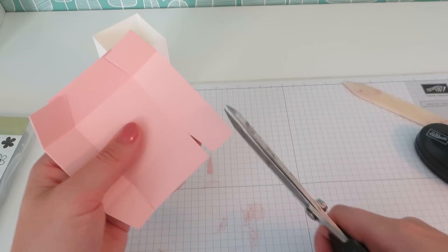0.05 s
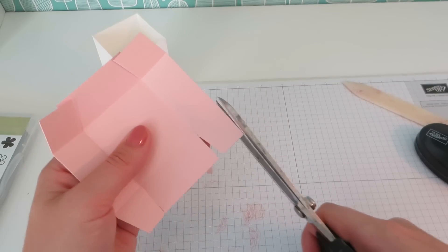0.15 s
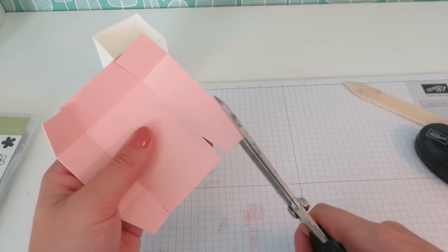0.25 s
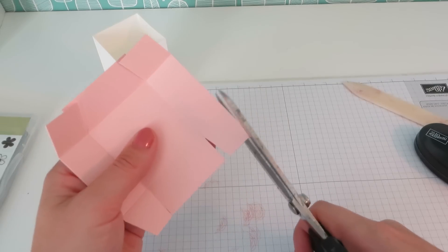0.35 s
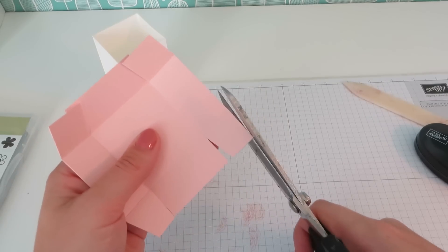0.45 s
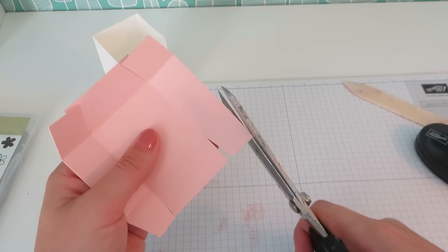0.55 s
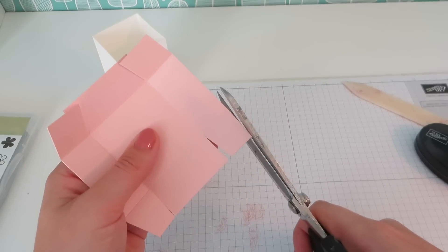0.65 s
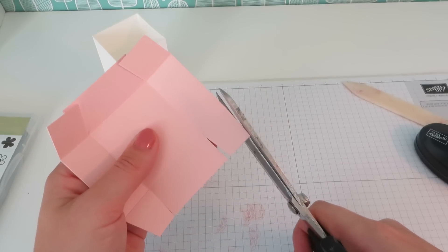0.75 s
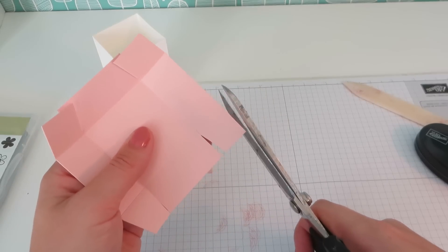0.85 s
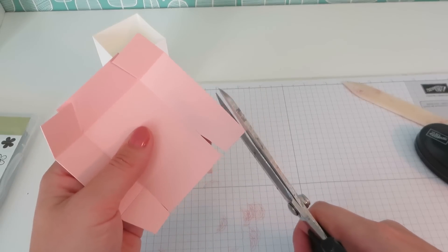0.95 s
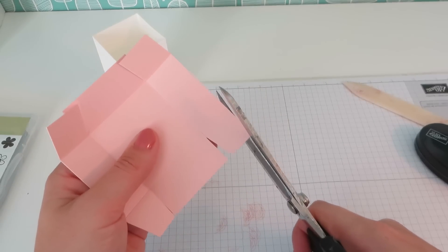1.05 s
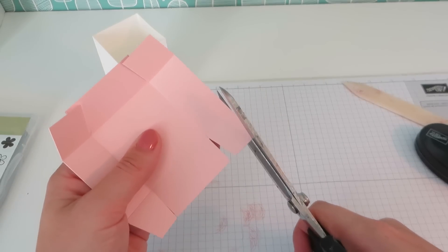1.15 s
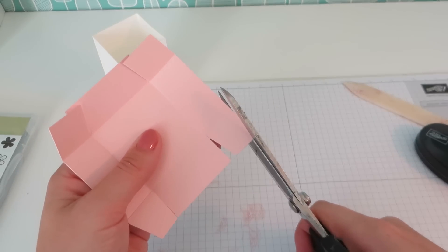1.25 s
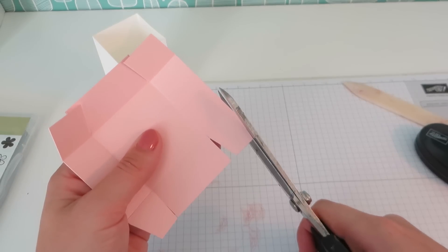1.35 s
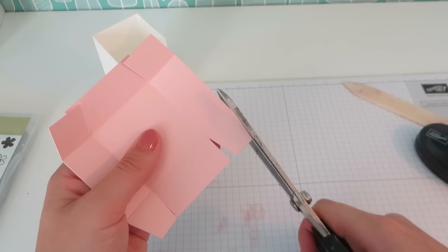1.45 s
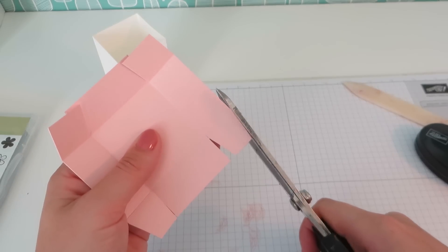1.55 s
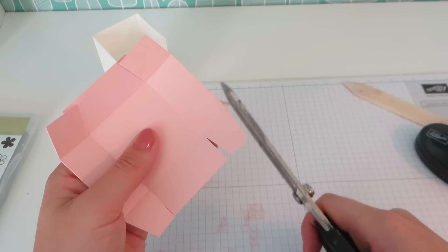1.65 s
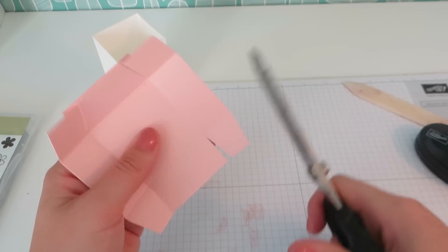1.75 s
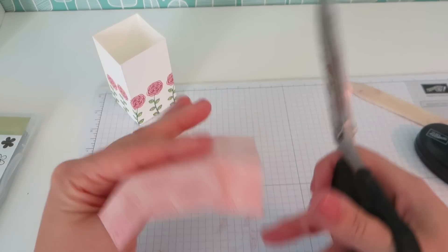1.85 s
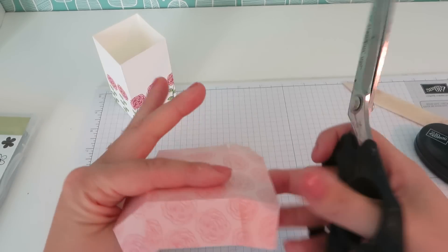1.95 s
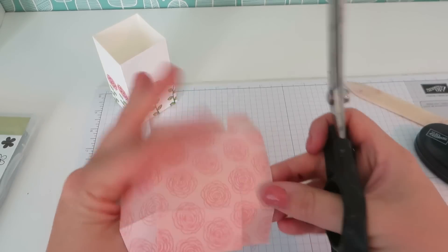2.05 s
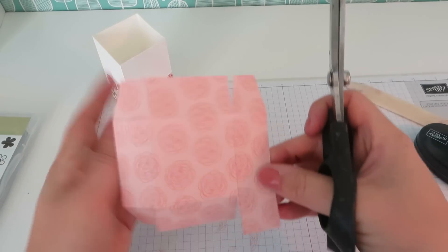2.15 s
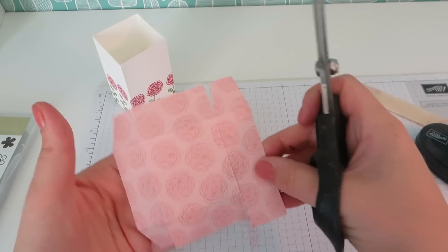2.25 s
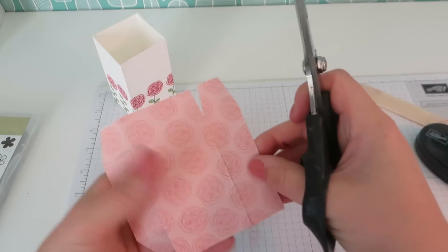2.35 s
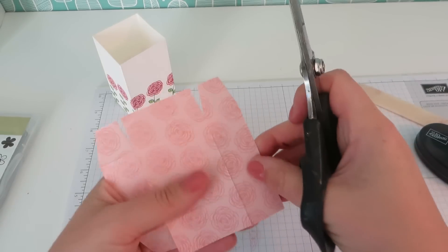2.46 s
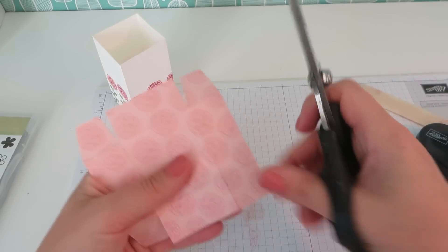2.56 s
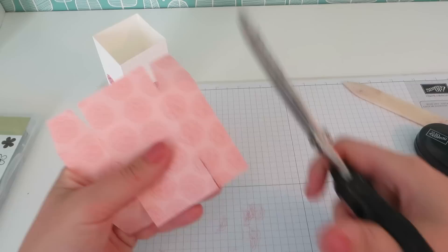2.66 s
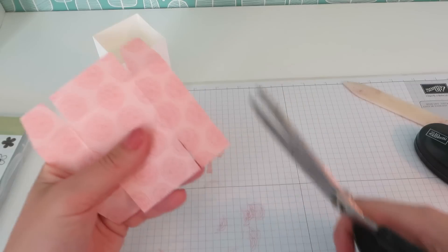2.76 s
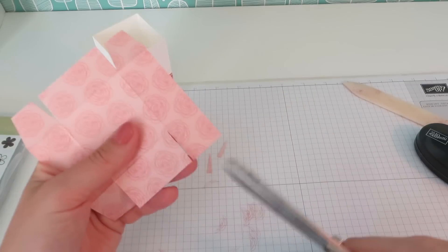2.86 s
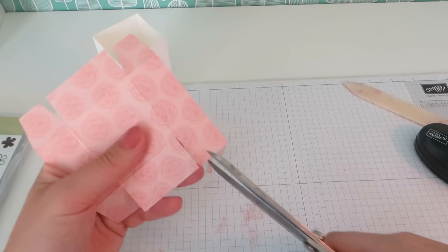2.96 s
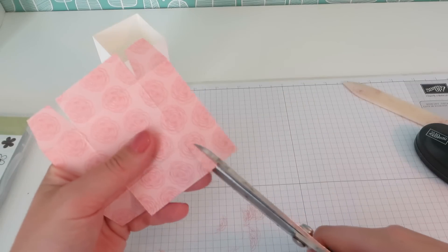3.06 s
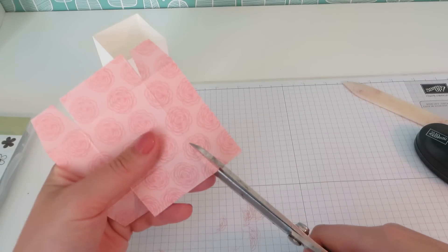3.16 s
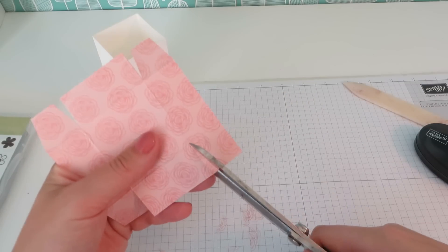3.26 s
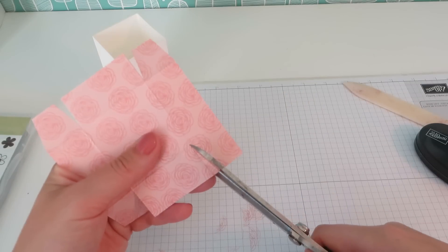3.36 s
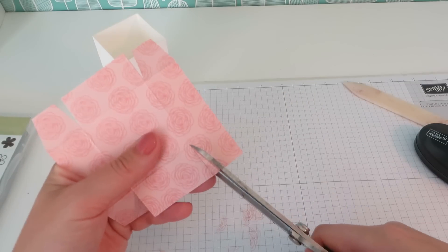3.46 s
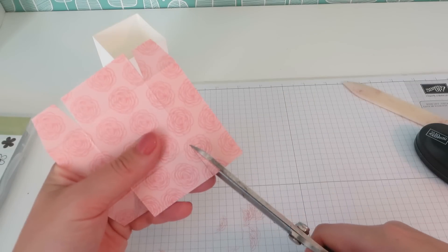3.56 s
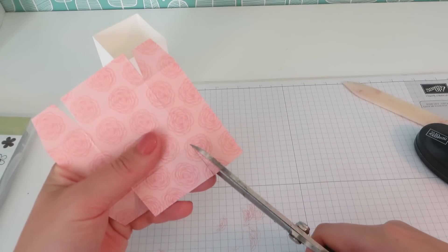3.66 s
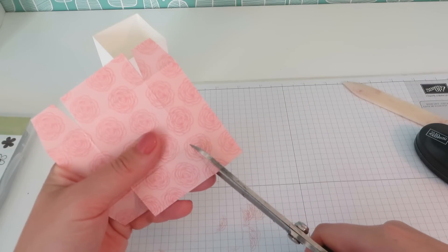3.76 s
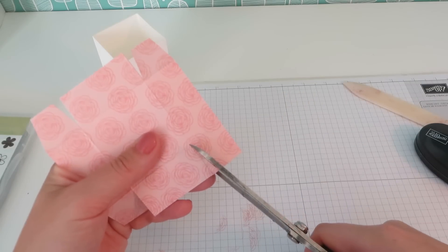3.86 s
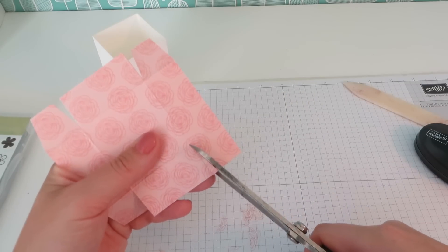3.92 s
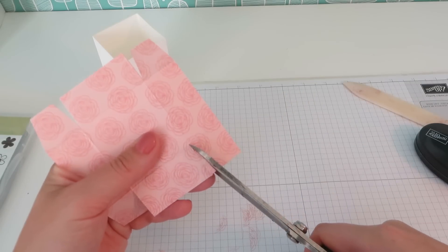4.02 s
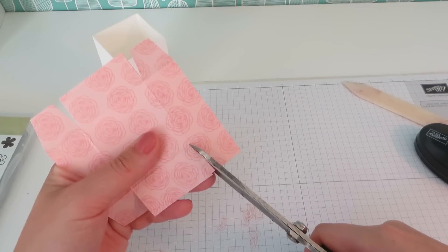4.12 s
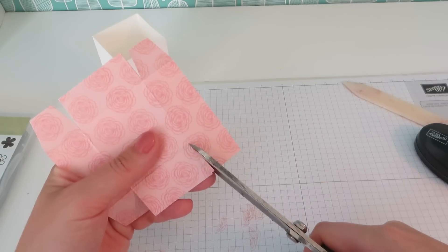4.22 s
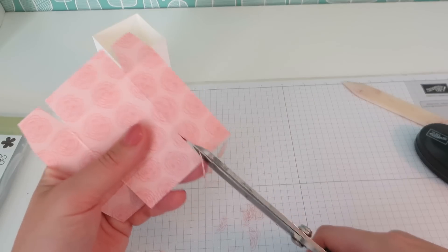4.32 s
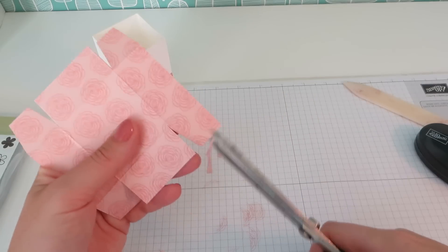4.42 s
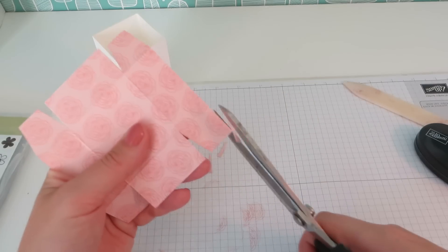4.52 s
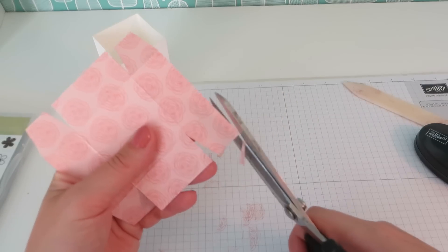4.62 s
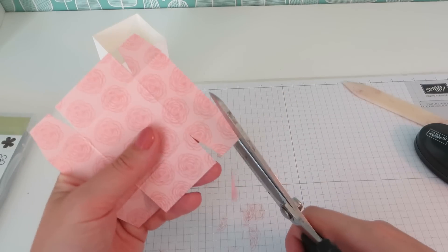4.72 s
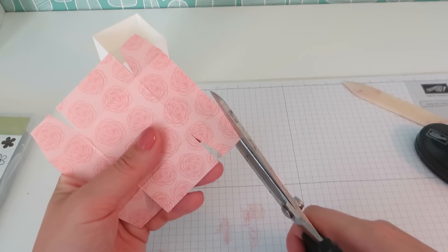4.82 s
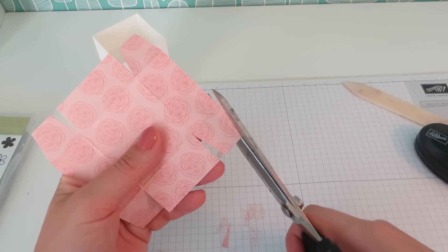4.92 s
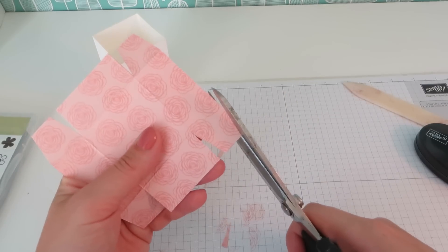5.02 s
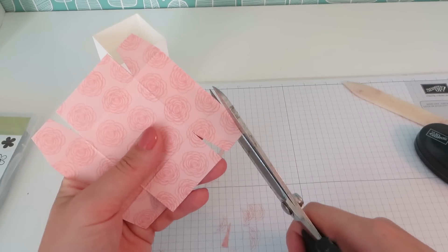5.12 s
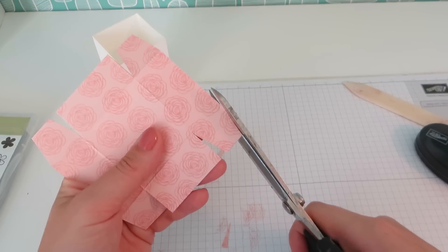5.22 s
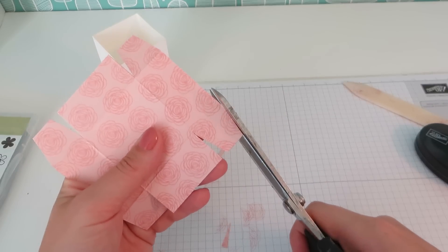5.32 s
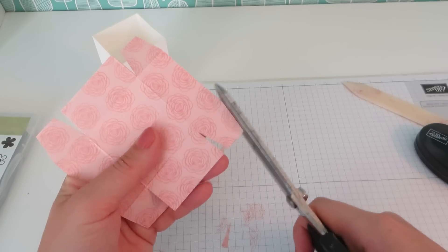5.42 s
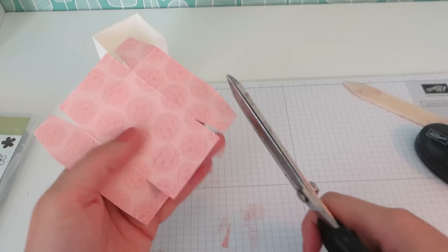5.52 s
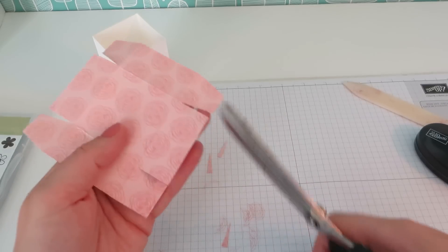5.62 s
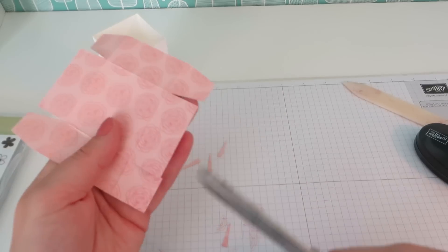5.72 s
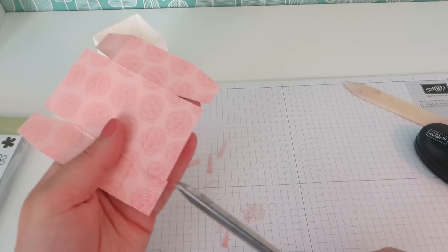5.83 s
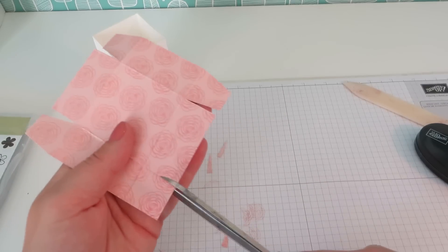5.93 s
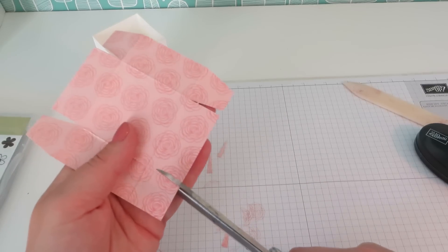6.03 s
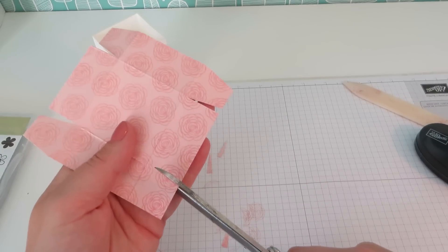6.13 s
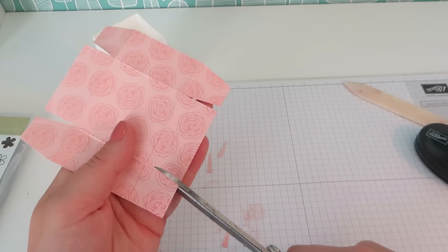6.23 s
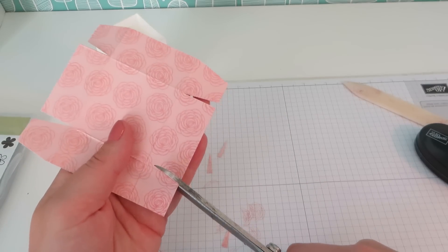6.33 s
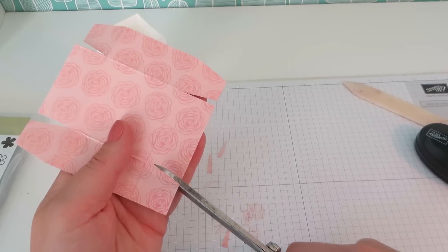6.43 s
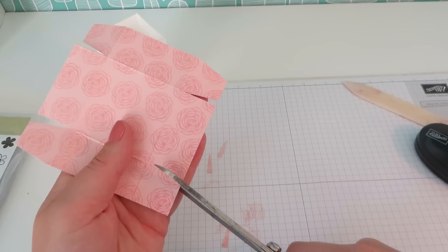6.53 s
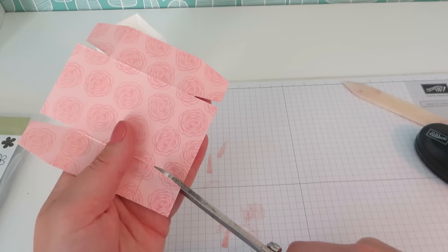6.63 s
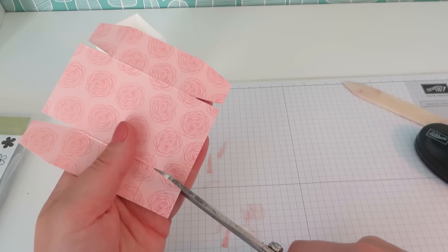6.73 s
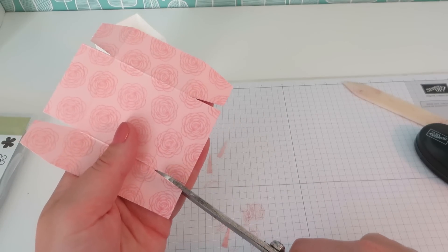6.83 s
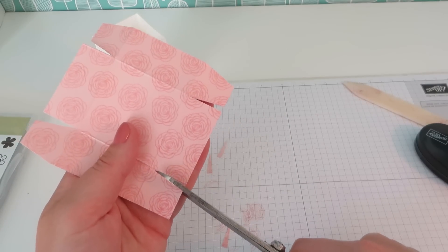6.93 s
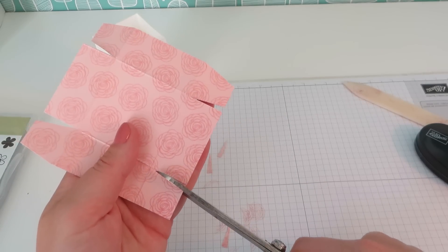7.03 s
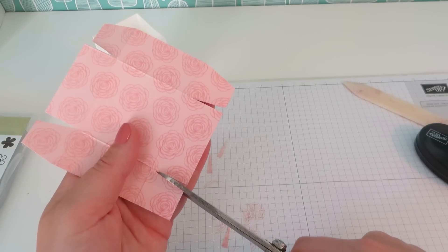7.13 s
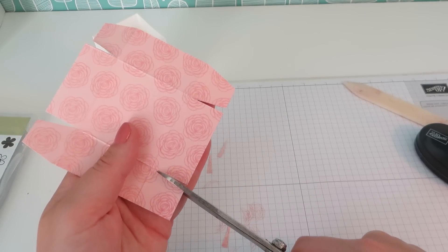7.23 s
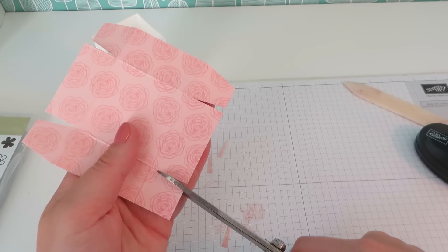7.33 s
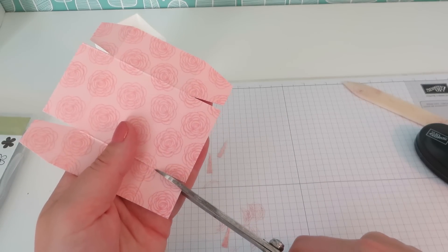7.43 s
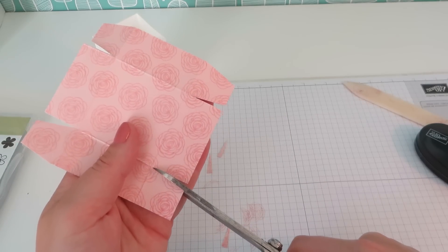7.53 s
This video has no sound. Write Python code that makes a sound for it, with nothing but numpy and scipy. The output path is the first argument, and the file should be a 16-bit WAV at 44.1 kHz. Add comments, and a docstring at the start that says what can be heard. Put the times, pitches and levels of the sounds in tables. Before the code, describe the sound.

Dry, papery cutting heard near the microphones indoors. Blades slide quietly onto the card's edge, pause, then bite with a bright crisp snap. Between cuts the hand flips the card, giving a dense burst of rustles, clicks and a dull little knock. Later cuts are lighter and grainier, separated by near silence with a gentle wide room hiss and very short reflections.

```python
"""Scissors cutting stiff card

Scissors snip stiff paper card held in one hand over a craft table, heard close by in stereo.
Frictional noise scrapes along blades and fingers, breaks into short bursts as the cut advances and snaps
at folds, and excites damped modes of card and blades. Low knocks are decaying sines; sparse echoes
follow. A quiet room hiss of shaped noise lies under it, wide in the low middle."""
import sys
import numpy as np
from scipy import signal
from scipy.fft import rfft, irfft, next_fast_len
from scipy.io import wavfile

SR = 44100
rng = np.random.default_rng(int(sys.argv[2]) if len(sys.argv) > 2 else 0)


def level_to_linear(level):
    """Convert decibel levels to linear amplitude factors, elementwise."""
    exponent = np.asarray(level, float) / 20
    return 10 ** exponent


def wav_record(signal):
    """Record a signal, one row per channel, as 16-bit PCM in the file named by sys.argv[1]."""
    frames = np.transpose(np.atleast_2d(signal))
    bounded = np.clip(frames, -1, 1)
    # unit amplitude maps onto the largest positive 16-bit level
    quanta = np.round(bounded * 32767).astype(np.int16)
    wavfile.write(sys.argv[1], SR, quanta)


N = 334278  # length in samples

# brightness_octaves counts from 1 kHz; boom_db is the drive of card modes under 1 kHz, relative to level_db
# sharp bursts where the card snaps or knocks: start_s, level_db (relative), boom_db, brightness_octaves
SNAPS = [(0.1672, -37.5, -8, 0.13), (0.2215, -33.5, -3, 1.96), (1.627, -38, 3.5, 1.8),
         (1.781, -15.5, -26, 2.19), (2.244, -24, -6, 2.46), (2.262, -20, -12.5, 1.98), (2.281, -28, -16, 2),
         (2.373, -22, -7, 1.57), (2.382, -24, -7, 1.3), (2.407, -28, 14, 2.8), (2.42, -26, -16, 1),
         (2.43, -37, -10, 1.8), (2.4557, -26.5, -4, 0.69), (2.8165, -45, 13.5, 1.6),
         (4.1835, -30, -17, 2.25), (4.2874, -27.5, -11, 1.07), (4.9991, -31, -5.5, 2.2),
         (5.306, -35.5, -8, 3.7), (5.5646, -22, 0, 1.4), (5.575, -27.5, 6, 2.3), (5.6823, -24, -15, 2.42),
         (5.6875, -33, -3, 0.26), (7.3064, -34, -31, 1.8), (7.3783, -27.5, -27, 2.22)]
# resonant modes of card and blades: frequency_hz, width_hz, level_db (relative)
CARD_MODES = [(828, 160, 1.5), (1180, 590, 2), (1760, 96, -6), (2100, 210, -1), (2393, 153, 3.5),
              (2680, 67, -8.5), (3146, 320, -6.5), (3553, 370, -10.5), (4294, 370, -9.5), (5047, 900, -7.5),
              (6210, 1800, 1.5), (8530, 3200, 4)]
# edges of the friction-noise bands: frequency_hz
BAND_EDGES_HZ = [520, 1500, 3100, 5200, 8200, 16000]
BANDS = len(BAND_EDGES_HZ) - 1
SNAP_RISE_S = 0.0013  # time constant


def evened(x):
    """Normalises mean power: scales to rms 1."""
    return x / np.sqrt(np.mean(x ** 2) + 1e-20)


def read(points, hz):
    """Interpolates a spectrum linearly in dB along a log-frequency axis."""
    f, value = np.transpose(points)
    return np.interp(np.log(hz + 1), np.log(f + 1), value)


def add(mix, s, sound):
    """Superposes a sound, or a power curve, on the mix at time s."""
    part = mix[..., round(s * SR):][..., :sound.shape[-1]]
    part += sound[..., :part.shape[-1]]


def colour(x, points, turn=1):
    """Linear filtering: weights the spectrum by a table and a complex phase factor."""
    size = next_fast_len(N)
    weight = turn * level_to_linear(read(points, np.fft.rfftfreq(size, 1 / SR)))
    return irfft(rfft(x, size) * weight, size)[..., :N]


def wander(seconds, count):
    """Slow random modulation: Gaussian knots joined by straight lines, one row a stream."""
    knots = rng.standard_normal((count, 2500))
    position = np.arange(N) / SR / seconds
    return np.array([np.interp(position, np.arange(2500), k) for k in knots])


def shares(boom_db, octaves):
    """Division of contact power: a hump of bands at the brightness, then the modes near it and the boom."""
    middle_product = np.multiply(BAND_EDGES_HZ[:-1], np.minimum(BAND_EDGES_HZ[1:], 12000))
    centres = np.log2(middle_product / 1e6) / 2  # octaves over 1 kHz
    hump = level_to_linear(-5.5 * (centres[:, None] - octaves) ** 2) ** 2
    hz = np.transpose(CARD_MODES)[0][:, None]
    # the nearest modes ring most
    near_db = np.maximum(-28 * (np.log2(hz / 1000) - octaves) ** 2, -12)
    modes = level_to_linear(np.where(hz < 1000, boom_db, near_db)) ** 2
    return np.vstack([hump / hump.sum(0), modes])


def stroke(rows):
    """Sliding friction: power catches fast, follows the pressure and lets go slower."""
    catch_s, let_go_s = 0.00094, 0.016
    s, *controls = np.transpose(rows)
    t = np.arange(s[0], s[-1], 1 / SR)
    db, boom_db, octaves = (np.interp(t, s, c) for c in controls)
    edges = np.minimum(1, np.minimum((t - s[0]) / catch_s, (s[-1] - t) / let_go_s))
    return s[0], shares(boom_db, octaves) * (level_to_linear(db) * edges) ** 2


def scrapes(power):
    """Brief sliding friction of card along blade or skin, its level changing steadily in dB."""
    # short scrapes: start_s, end_s, level_db (relative, midway), boom_db, brightness_octaves
    scrape_rows = [(0, 0.081, -34, -6.5, 2), (0.951, 1.014, -49, -27, 2.5), (1.438, 1.563, -42.5, -1, 1.75),
                   (1.953, 2.115, -35, -11.5, 2.1), (2.369, 2.444, -28.5, -14, 1.6),
                   (2.466, 2.595, -33, -13.5, 1.91), (2.628, 2.708, -33, -4.5, 2.13),
                   (2.802, 3.016, -46, -9, 1.9), (3.78, 4.142, -46.5, -10, 1.9),
                   (4.447, 4.544, -45.5, -18, 2.26), (5.303, 5.503, -48, -5, 1.7),
                   (2.235, 2.294, -29, -21, 0.18), (7.142, 7.232, -43.5, -9, 2.16),
                   (7.44, 7.507, -42, -24, 1.9)]
    even_db, swell = -37, 0.41  # scrapes above this level swell, lighter ones fade: dB at each end per dB
    for start, end, db, *tone in scrape_rows:
        swell_db = swell * (db - even_db)
        add(power, *stroke([(start, db - swell_db, *tone), (end, db + swell_db, *tone)]))


def long_strokes(power):
    """Sustained sliding friction whose power tracks a varying contact pressure."""
    # the open blades slide onto the edge of the card: time_s, level_db (relative), boom_db, brightness_octaves
    slide_strokes = [
        [(1.225, -44, -15, 2.1), (1.267, -41, 11, 1.6), (1.305, -40.5, 13, 1.1), (1.328, -62, -4, 1.3)],
        [(3.172, -35, -3, 1.83), (3.224, -37.5, -0.5, 1.66), (3.27, -33.5, -6.5, 1.6), (3.36, -43.5, -1, 1.67)],
        [(4.722, -38.5, 3.5, 1.63), (4.8, -42, -1.5, 1.45), (4.862, -41, 5, 0.97), (4.936, -48.5, 1, 1.1)],
        [(6.095, -35, -17, 1.8), (6.18, -39, -2, 2.27), (6.195, -34.5, -6, 2.6), (6.234, -41.5, 8, 1)],
    ]
    # the blades bite through: time_s, level_db (relative), boom_db, brightness_octaves
    cut_stroke = [(1.645, -56, 14, 1.8), (1.779, -31, -8.5, 1.67)]
    # the hand turns the card: time_s, level_db (relative), boom_db, brightness_octaves
    turn_strokes = [
        [(2.157, -42.5, 1.5, 1.87), (2.232, -33, -6, 1.9), (2.245, -25, -27, 1.86), (2.285, -18, -23, 1.62),
         (2.296, -29.5, -29, 1.85), (2.355, -26.5, -2, 2.5)],
        [(5.496, -44, -12, 0.58), (5.562, -33, -10, 1.2), (5.59, -36.5, -5, 1.8), (5.76, -38, -17, 2.24),
         (5.83, -37.5, -14, 2), (5.914, -43.5, -14, 2.4)],
    ]
    for rows in slide_strokes + [cut_stroke] + turn_strokes:
        add(power, *stroke(rows))


def snaps(power):
    """Sudden fracture: fibres give way with a fast rise of power, then settle exponentially."""
    t, t60_s = np.arange(4000) / SR, 0.029
    burst = (1 - np.exp(-t / SNAP_RISE_S)) * level_to_linear(8.5 - 60 * t / t60_s)
    for s, db, boom_db, octaves in SNAPS:
        add(power, s, shares(boom_db, octaves) * (level_to_linear(db) * burst) ** 2)


def slip_pulse():
    """A partial slip as a smooth asymmetric pulse; returns the time of its middle and its amplitude."""
    rise_s, fall_s = 0.0068, 0.004  # to 1/e of the middle
    t = np.arange(4000) / SR
    late = t - t[1000]
    return t[1000], np.exp(-abs(late / np.where(late > 0, fall_s, rise_s)) ** 1.4)


def tears(power):
    """Progressive tearing: each slip releases a pulse of power, and brighter slips shake the card less."""
    # slips where the blades tear a little further: middle_s, level_db (relative), brightness_octaves
    tear_rows = [(1.669, -29, 1.83), (1.72, -28, 1.6), (2.31, -22, 2), (2.319, -18, 1.75),
                 (2.659, -26, 1.53), (5.118, -45.5, 3.5), (5.179, -40.5, 2.1), (3.282, -29.5, 1.04),
                 (3.848, -34.5, 0.66), (3.884, -34.5, 2.37), (3.973, -28, 2.25), (4.016, -32, 2.2),
                 (4.069, -31.5, 2.3), (4.226, -25, 2.57), (4.499, -31.5, 1.73), (5.232, -34.5, 1.6),
                 (5.419, -31.5, 1.1), (5.446, -32.5, 2.07), (5.502, -31.5, 1.8), (6.104, -32, 1.84),
                 (6.2, -30.5, 1), (6.98, -30.5, 2.1), (7.164, -30.5, 2), (7.202, -31, 2.15),
                 (7.356, -34, 2.2), (7.453, -34, 1.7)]
    middle, slip = slip_pulse()
    for s, db, octaves in tear_rows:
        boom_db = -12 - 2.5 * (octaves - 1)  # falls 2.5 dB per octave of brightness
        add(power, s - middle, shares(boom_db, octaves) * (level_to_linear(db) * slip) ** 2)


def touches(power):
    """Selective excitation: shifting fingertips barely stir the lowest card mode."""
    # fingertips shift on the card: middle_s, boom_level_db (relative)
    touch_rows = [(6.378, -41), (6.498, -37), (6.605, -37.5)]
    middle, slip = slip_pulse()
    for s, db in touch_rows:
        add(power[BANDS], s - middle, (level_to_linear(db) * slip) ** 2)


def drive():
    """Incoherent sources add in power: the amplitude driving each band and mode over time."""
    power = np.zeros((BANDS + len(CARD_MODES), N))
    scrapes(power)
    long_strokes(power)
    # fingers never quite still
    power += shares(-1.0, 1.57) * level_to_linear(-58.0 + 3.3 * wander(0.017, count=1)) ** 2
    # stick and slip, partly common and partly per band
    flutter_db = 2.2 * wander(0.005, count=1) + 2.6 * wander(0.008, count=len(power))
    power *= level_to_linear(flutter_db) ** 2
    snaps(power)
    tears(power)
    touches(power)
    return np.sqrt(power)


def card():
    """Forced resonance: uneven fibre noise and one crack a snap drive noise bands and damped modes."""
    # how well the small card radiates: frequency_hz, level_db
    radiation = [(300, 7.5), (560, -7), (740, -1.5), (2200, -1), (10500, -3), (12500, -8.5), (15000, -33)]
    size = evened(level_to_linear(3 * np.minimum(rng.exponential(1, N), 4)))  # uneven grains
    s = np.transpose(SNAPS)[0]
    crack = np.zeros(N)
    crack[np.round((s + SNAP_RISE_S) * SR).astype(int)] = level_to_linear(22.0)
    force = drive()
    grip = level_to_linear(2.1 * wander(0.012, count=len(CARD_MODES)))  # mode shares shift as the grip moves
    out = np.zeros(N)
    for push, lo, hi in zip(force, BAND_EDGES_HZ, BAND_EDGES_HZ[1:]):
        band = signal.butter(3, (lo, hi), "band", fs=SR, output="sos")
        noise = signal.sosfilt(band, size * rng.standard_normal(N) + crack)
        out += level_to_linear(-6) * push * evened(noise)
    grit = size * rng.standard_normal(N) + crack
    for (hz, width, db), push in zip(CARD_MODES, force[BANDS:] * grip):
        r = np.exp(-np.pi * width / SR)
        poles = [1, -2 * r * np.cos(2 * np.pi * hz / SR), r * r]
        equal = np.sqrt((1 - r * r) / 2)  # same energy whatever the width
        out += level_to_linear(db - 6.0) * equal * signal.lfilter([1, 0, -1], poles, push * grit)
    return colour(out, radiation)


def ticks():
    """Modal ringing: short rasps of grit excite the bare blades, thin and without the card."""
    # the blade tips tick together: middle_s, level_db (relative)
    tick_rows = [(0.984, -29.5), (0.997, -36.5)]
    # modes of the bare blades: frequency_hz, width_hz, level_db (relative)
    blade_modes = [(2400, 95, -1.5), (3950, 140, 1.5), (6000, 900, -1.5), (7800, 960, -6.5)]
    t, out = np.arange(N) / SR, np.zeros(N)
    push = sum(level_to_linear(db) * np.exp(-((t - s) / 0.0043) ** 2) for s, db in tick_rows)
    for (hz, width, db), grit in zip(blade_modes, rng.standard_normal((len(blade_modes), N))):
        b, a = signal.iirpeak(hz, hz / width, SR)
        equal = np.sqrt(SR / np.pi / width)  # offsets the power lost to a narrow mode
        out += level_to_linear(db) * equal * signal.lfilter(b, a, push * grit)
    return out


def thuds():
    """Damped oscillation: low sines with a soft start and exponential decay."""
    # dull knocks of hand and handle, felt through the table:
    # start_s, level_db (before the soft start), frequency_hz, t60_s
    thud_rows = [(1.327, -34.5, 115.5, 0.3), (2.406, -12, 268, 0.02), (2.648, -27, 220, 0.058),
                 (2.789, -34, 71, 0.47), (4.802, -26, 215, 0.067), (5.573, -27, 232, 0.04)]
    out, t = np.zeros(N), np.arange(20000) / SR
    for s, db, hz, t60 in thud_rows:
        envelope = (1 - np.exp(-t / t60 / 0.087)) * level_to_linear(db - 60 * t / t60)
        add(out, s, envelope * np.sin(2 * np.pi * hz * t))
    return out


def echoes(x, t60, count):
    """Sparse reflections from table and walls: decaying taps of random sign, unrelated per output."""
    taps = np.zeros((count, 8000))
    at = np.arange(60, 7980, 20) + rng.integers(0, 20, (count, 396))  # delays in samples
    sign = rng.choice([-1., 1.], at.shape)
    np.put_along_axis(taps, at, sign * level_to_linear(-60 * at / SR / t60), 1)
    return signal.oaconvolve(x[None], taps / np.linalg.norm(taps[0]), axes=1)[:, :N]


def room():
    """Stationary shaped noise, independent in middle and side, with a slight swell."""
    # spectrum of the middle hiss: frequency_hz, level_db (relative, per Hz)
    middle_hiss = [(18, -21), (33, -3), (60, -1.5), (82, -7), (118, -2.5), (146, -9), (211, -10),
                   (700, -13), (6630, -22), (13500, -44.5)]
    # spectrum of the side hiss: frequency_hz, level_db (relative, per Hz)
    side_hiss = [(25, -71), (87, 0), (372, 2.5), (8690, -27.5), (14000, -40)]
    noise = rng.standard_normal((2, N)) * level_to_linear(0.5 * wander(0.09, count=2))
    middle = level_to_linear(-47.5) * evened(colour(noise[0], middle_hiss))  # dB rms
    side = level_to_linear(-46.5) * evened(colour(noise[1], side_hiss))
    return np.array([middle, side])


def scene():
    """Middle-side stereophony: all sources summed, then turned to left and right."""
    # the two microphones hear the sources apart, side against middle: frequency_hz, level_db (relative)
    apart = [(300, -23), (800, -18), (2400, -31), (4500, -11), (8000, -5.5)]
    near = card() + ticks() + thuds()
    wet = echoes(near, 0.16, count=2)
    mid = near + level_to_linear(-7.5) * wet[0]
    # microphone spacing turns the phase by a quarter cycle
    side = level_to_linear(-1) * colour(near, apart, turn=1j) + level_to_linear(-4.0) * colour(wet[1], apart)
    mid, side = np.array([mid, side]) + room()
    return np.array([mid + side, mid - side])


def roll_off(x):
    """The treble ends steeply here."""
    return signal.sosfilt(signal.butter(12, 16480, fs=SR, output="sos"), x)


def record(dry):
    """Linear superposition is complete here: the finished stereo mix is passed on at unity gain."""
    return roll_off(dry)


dry = scene()
out = record(dry)
wav_record(out)
```